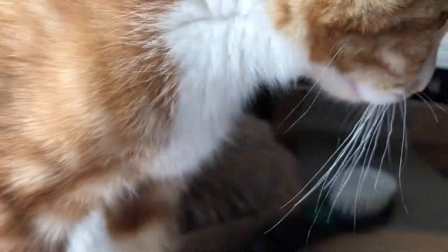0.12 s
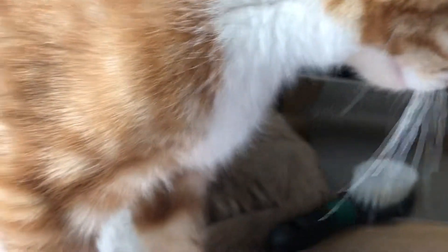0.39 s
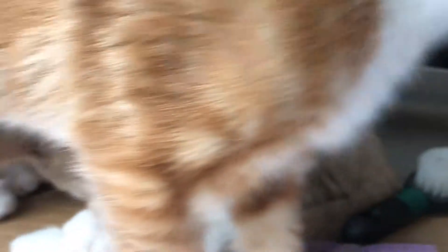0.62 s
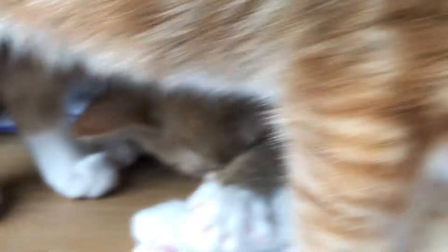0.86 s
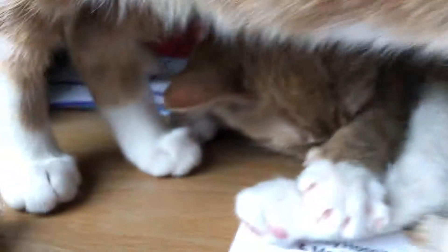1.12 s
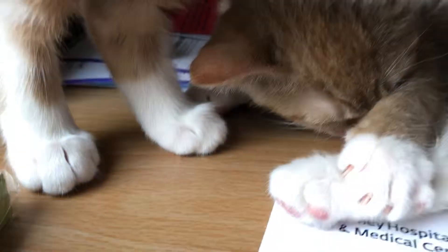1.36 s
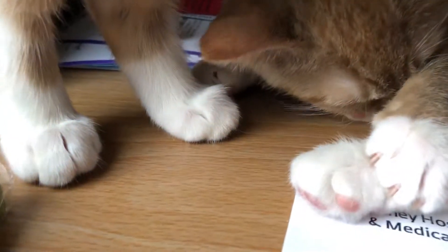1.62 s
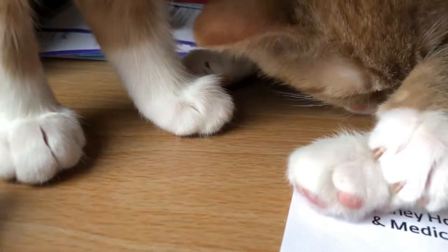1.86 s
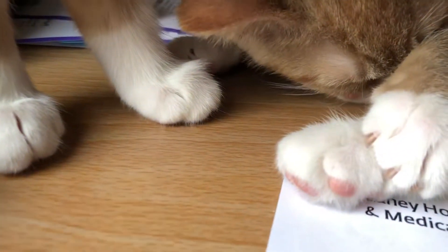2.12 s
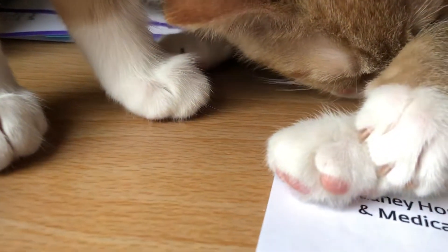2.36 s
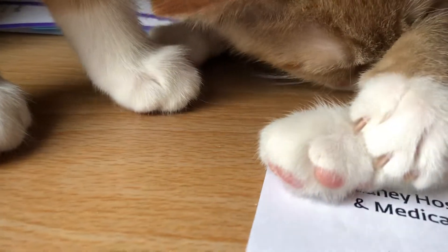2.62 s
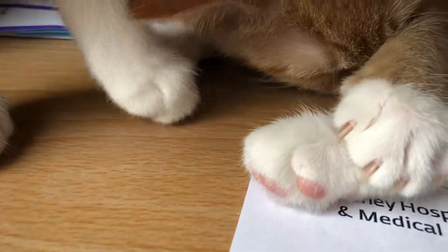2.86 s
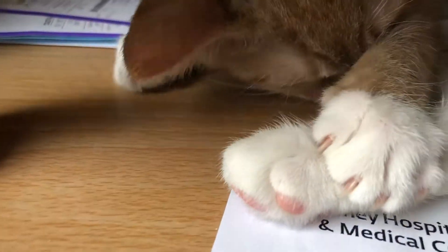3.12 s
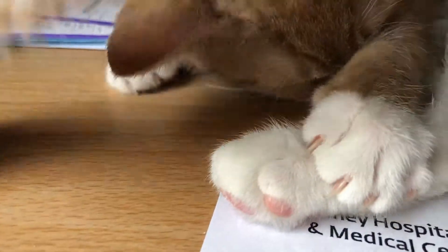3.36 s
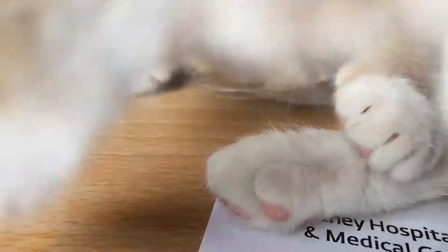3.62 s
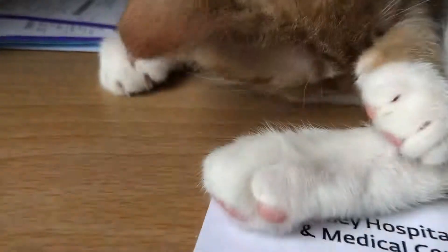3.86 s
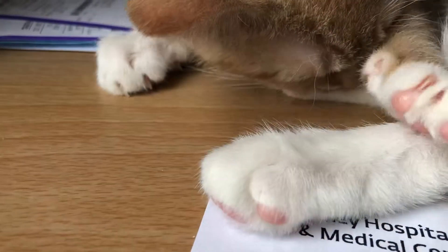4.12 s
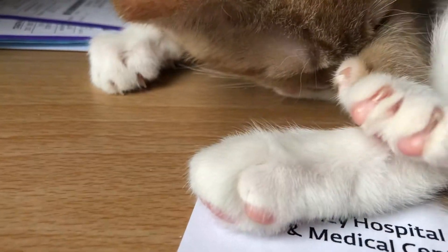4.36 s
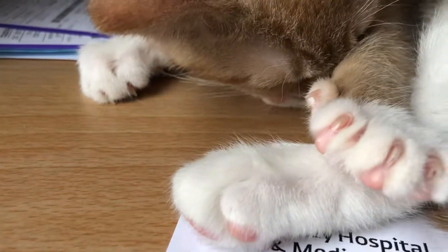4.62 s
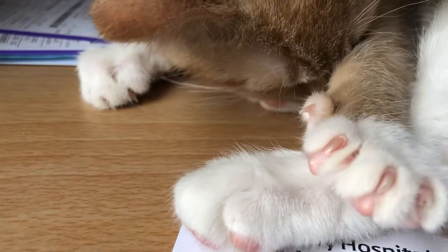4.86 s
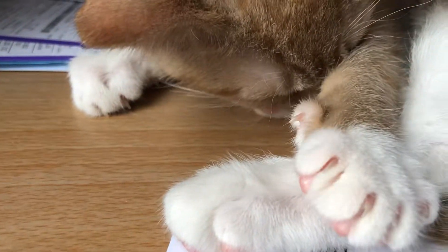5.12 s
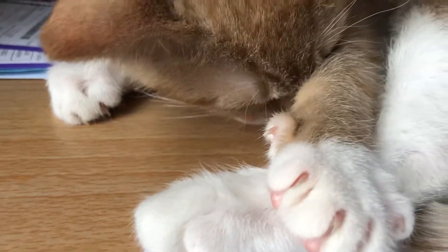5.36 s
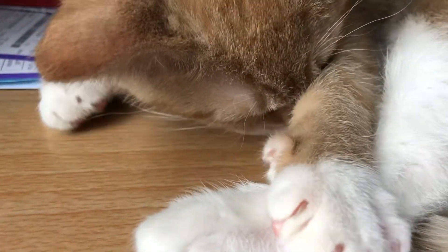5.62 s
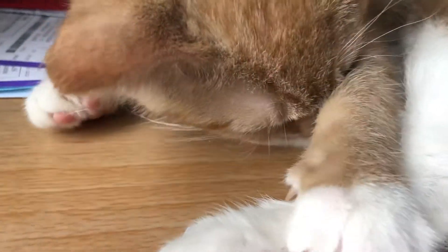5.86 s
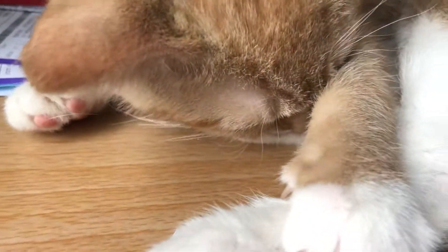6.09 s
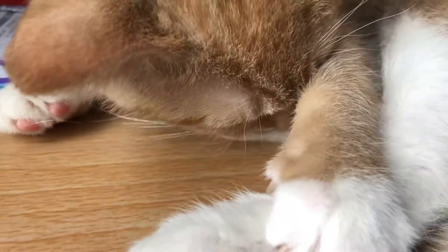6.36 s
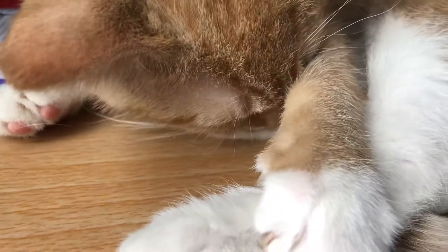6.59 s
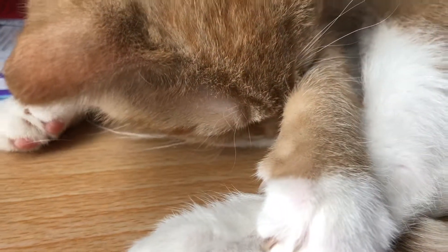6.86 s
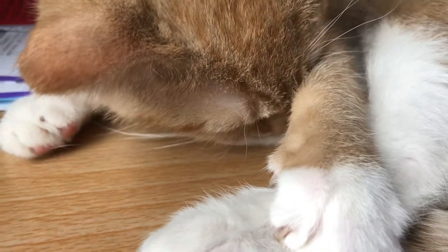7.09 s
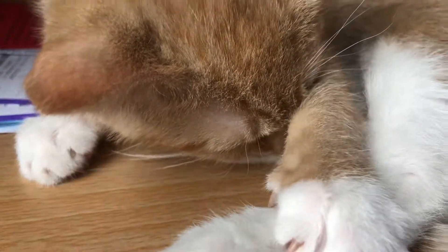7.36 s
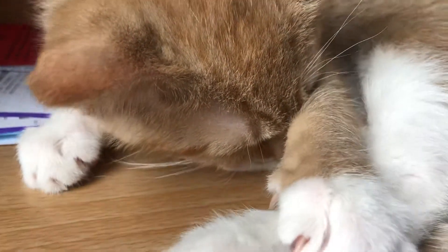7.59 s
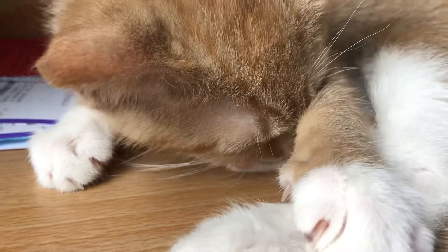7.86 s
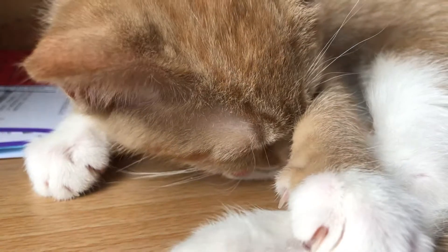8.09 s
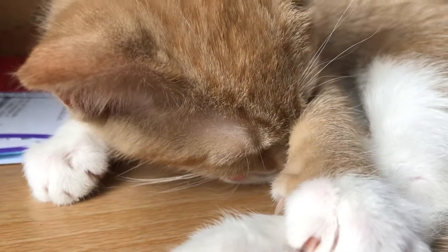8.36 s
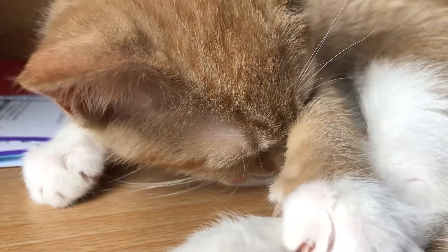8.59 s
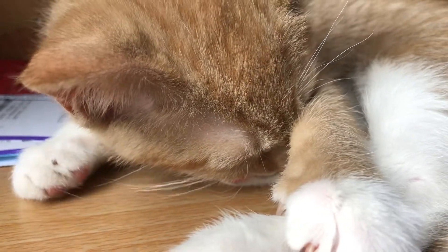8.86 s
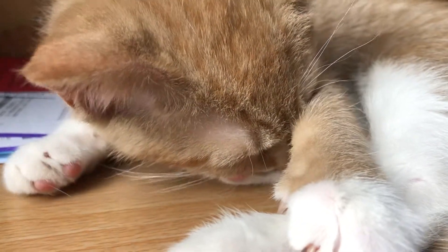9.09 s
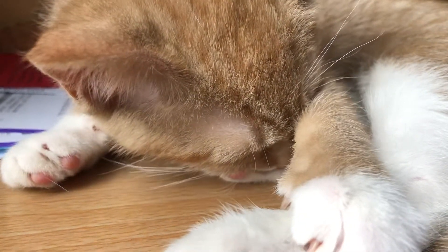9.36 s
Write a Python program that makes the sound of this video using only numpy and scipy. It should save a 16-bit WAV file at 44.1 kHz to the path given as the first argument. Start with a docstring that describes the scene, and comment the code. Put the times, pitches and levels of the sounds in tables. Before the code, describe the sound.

Close, throaty kitten purring swells and dips with each breath while its mouth ticks, smacks and squeaks wetly in a quiet room.

```python
"""Kitten purring as it suckles

Close at the microphone in a quiet room, a kitten purrs: two larynx pulses a cycle, some 27 cycles a second,
each filtered by throat resonances. Its mouth gives wet hisses, smacks, clicks and thin squeaks, made from
grains, ringing bubbles and gliding tones. A second cat purrs briefly at the start in single pulses. A paw
thumps once; coloured noise makes the fan and room; narrow low tones ring under them all."""
import sys
import numpy as np
from scipy import signal
from scipy.fft import rfft, irfft, next_fast_len
from scipy.io import wavfile
from scipy.ndimage import uniform_filter1d

SR = 44100
rng = np.random.default_rng(int(sys.argv[2]) if len(sys.argv) > 2 else 0)


def store_pcm(level_fs):
    """Save levels as 16-bit WAV."""
    pcm = np.round(np.clip(level_fs, -1, 1) * 32767).astype(np.int16)
    wavfile.write(sys.argv[1], SR, np.atleast_2d(pcm).T)


def attenuation_scalar(level_db):
    """Turn a level in dB into a linear amplitude multiplier (20 dB per decade)."""
    decades = np.asarray(level_db, float) / 20
    return 10 ** decades


N = 417627


def rms_one(x):
    """Scale to unit rms."""
    return x / np.sqrt(np.mean(x ** 2) + 1e-20)


def resonate(x, hz, width_hz):
    """Two-pole resonance with gain 1 on top."""
    r = np.exp(-np.pi * width_hz / SR)
    poles = [1, -2 * r * np.cos(2 * np.pi * hz / SR), r * r]
    return signal.lfilter([(1 - r * r) / 2, 0, (r * r - 1) / 2], poles, x)


def band(x, low, high):
    """Butterworth band-pass."""
    return signal.sosfilt(signal.butter(2, [low, high], "band", fs=SR, output="sos"), x)


def impulses(s, sizes):
    """One single-sample click per time."""
    at = np.round(np.asarray(s) * SR).astype(int)
    inside = (at >= 0) & (at < N)
    return np.bincount(at[inside], np.asarray(sizes)[inside], N) + 1e-18


# room and fan noise before overall scaling: pitch_hz, level_db (per Hz)
HUM = [(20, -85), (40, -10), (80, -7), (160, -2.5), (350, -8.5), (420, -16.5), (670, -14.5), (1160, -24.5),
       (1500, -28), (1800, -30.5), (2700, -35.5), (4100, -37.5), (5500, -33), (7200, -37), (9500, -32),
       (10300, -39.5), (13000, -43), (16000, -49.5)]
# edges between the treble bands that flicker apart: pitch_hz
HUM_FLICKER_HZ = [2500, 4200, 5600, 7200, 8800, 10400, 12200, 14000, 16000]


def hum():
    """Noise coloured by the room spectrum; its treble bands rise and sink on their own."""
    hum_db, flicker_db, step = -55, 1.6, 4096   # step: samples between flicker points
    hz, db = np.transpose(HUM)
    grid = np.linspace(1, SR / 2, N // 2 + 1)
    coloured = rfft(rng.standard_normal(N)) * attenuation_scalar(np.interp(np.log(grid), np.log(hz), db))
    part = np.searchsorted(HUM_FLICKER_HZ, grid)
    sway_db = rng.standard_normal((len(HUM_FLICKER_HZ) + 1, N // step + 2)) * flicker_db
    sway_db[0] = 0   # below the lowest edge it holds steady
    total = 0
    for k, row in enumerate(sway_db):
        noise = irfft(coloured * (part == k), next_fast_len(N))[:N]
        total = total + noise * attenuation_scalar(np.interp(np.arange(N) / step, np.arange(len(row)), row))
    return attenuation_scalar(hum_db) * rms_one(total)


# the kitten's breaths: start_s, purr_cycles, mid_breath_lateness_ms, late_then_early_sway_ms,
# first_pulse_lead_ms, airflow (1 out, -1 in, 0 held)
BREATHS = [(-0.0514, 9, 3.2, 0.7, 13.7, 1), (0.2851, 24, -4.2, 1.9, 13.5, -1),
           (1.1317, 24, 11.6, -0.7, 13.3, 1), (2.0305, 21, -1.5, -1.1, 11.8, -1),
           (2.7743, 15, 0.1, -1.5, 13.2, 1), (3.3341, 9, 2.5, -1.3, 13.8, 0),
           (3.6417, 18, -4.3, 1.5, 11.2, -1), (4.2568, 21, 5.8, -0.9, 13.6, 1),
           (5.0348, 15, -6.7, -0.4, 11.6, -1), (5.5625, 18, 1.0, -1.6, 12.8, 1),
           (6.2409, 18, -2.8, 0.7, 11.3, -1), (6.8789, 12, -0.3, -0.0, 12.8, 0),
           (7.3134, 27, 2.1, -1.2, 12.8, 1), (8.3431, 15, 0.4, -1.4, 12.0, -1),
           (8.8913, 6, 1.4, 0.3, 12.5, 0), (9.1011, 12, -4.4, 0.1, 12.5, 1)]
# purr strength of each breath: level_db
BREATH_DB = [-48, -45.5, -37, -36.5, -36.5, -36.5, -38, -37.5, -38.5, -35.5, -36.5, -40.5, -37, -38, -41.5,
             -37]
# the purr falters: centre_s, change_db, half_length_s
FALTERS = [(1.48, -3.5, 0.1), (1.797, -3.5, 0.074), (5, -5, 0.054), (5.666, -6.5, 0.1), (5.96, -3.5, 0.075),
           (6.253, -4.5, 0.12), (7.21, -4.5, 0.094), (7.794, -7.5, 0.05), (8.075, -8.5, 0.063),
           (8.305, -3.5, 0.059), (9.12, -8, 0.034)]


def breathing():
    """Per purr cycle: time, lead of the first pulse, strength and whether air flows out."""
    last_breath_end_s, turn_db = 9.5524, -41   # the purr sinks at least to turn_db where the airflow turns
    swell_s, fade_s = {1: 0.093, -1: 0.3, 0: 0.085}, {1: 0.093, -1: 0.51, 0: 0.11}   # by airflow
    start, cycles, late_ms, sway_ms, lead_ms, flow = np.transpose(BREATHS)
    end = np.append(start[1:], last_breath_end_s)
    k = np.repeat(np.arange(len(start)), cycles.astype(int))   # breath that each cycle belongs to
    part = (np.arange(len(k)) - (np.cumsum(cycles) - cycles)[k]) / cycles[k]
    when = start[k] + part * (end - start)[k]
    when += late_ms[k] / 1000 * 4 * part * (1 - part)
    when += sway_ms[k] / 1000 * np.sin(2 * np.pi * part)
    corners = []
    for s, e, f, db, before_db in zip(start, end, flow, BREATH_DB, [BREATH_DB[0]] + BREATH_DB):
        if f != 0:
            corners.append((s, min(turn_db, db, before_db)))
        corners += [(s + swell_s[f], db), (e - fade_s[f], db)]
    db = np.interp(when, *np.transpose(sorted(corners)))
    db += sum(change_db * np.exp(-((when - s) / half_s) ** 2) for s, change_db, half_s in FALTERS)
    return when, uniform_filter1d(lead_ms[k], size=3), db, flow[k] > 0


# throat and chest resonances, levels relative: pitch_hz, width_hz, first_pulse_db,
# second_pulse_breathing_in_db, second_cat_db, second_pulse_breathing_out_db
THROAT = [(110.5, 124, 8, 0, -7, -0.5), (290, 412, 7, 3.5, -6.5, 3.5), (652, 160, 3, -3, -10, 6.5),
          (918, 480, -14, -7, -12.5, -4), (1448, 152, -13.5, 9.5, -15, 0), (2150, 480, -33, -0.5, -19.5, 0),
          (3300, 210, -46, -57, -23, 0), (6100, 500, -60, -60, -22, 0)]


def through_throat(clicks, rows, column, lag_hz, top_hz, count, chest_ms=0):
    """Resonances in parallel; soft tissue delays the lows, so each pulse sweeps downward. A unit click peaks at 1."""
    signs = (-1, 1, 1, -1, 1, -1, 1, -1)
    out = 0
    for k in rows:
        delay = round(chest_ms * SR / 1000) if k < 2 else 0   # the two chest resonances may answer late
        out = out + signs[k] * attenuation_scalar(THROAT[k][column]) * resonate(np.arange(4096) == delay, *THROAT[k][:2])
    a = (1 - np.tan(np.pi * lag_hz / SR)) / (1 + np.tan(np.pi * lag_hz / SR))
    for _ in range(count):
        out = signal.lfilter([-a, 1], [1, -a], out)   # all-pass
    out = signal.sosfilt(signal.butter(4, top_hz, fs=SR, output="sos"), out)
    return signal.oaconvolve(clicks, out / np.abs(out).max())[:N]


# the larynx through the purr: time_s, first_over_second_pulse_db, rasp_level_db
LARYNX = [(0.05, -11, -62), (0.25, -6, -61), (0.45, -12.5, -52.5), (0.65, 4, -60), (0.85, 4, -56),
          (1.05, 2, -56), (1.25, 2, -50.5), (1.45, 9, -55), (1.65, 3.5, -52.5), (1.85, 4, -53.5),
          (2.05, -9, -49.5), (2.25, -8, -48), (2.45, -6.5, -49.5), (2.65, -2, -56), (2.85, 4.5, -55),
          (3.05, 4.5, -51), (3.25, 0, -45), (3.45, 7, -51.5), (3.65, -9, -47), (3.85, -3, -48.5),
          (4.05, -5, -50), (4.25, 0, -58), (4.45, 5.5, -48), (4.65, -1.5, -47), (4.85, 11.5, -54.5),
          (5.05, -3, -49.5), (5.25, -5, -46), (5.45, -1, -57), (5.65, 5, -49.5), (5.85, 3, -50.5),
          (6.05, 2.5, -48), (6.25, 9.5, -54.3), (6.45, -7.2, -48), (6.65, 3, -48.5), (6.85, -3, -48.5),
          (7.05, 5, -59), (7.25, 5, -64), (7.45, 4.5, -52), (7.65, 0.5, -51), (7.85, 11, -50.0),
          (8.05, 1.2, -51), (8.25, 4.5, -55), (8.45, -6.5, -49.6), (8.65, -8, -47), (8.85, 4.5, -55),
          (9.05, 2, -57.5), (9.25, 8.5, -50), (9.45, -3, -59)]


def purr():
    """The larynx gives a dull pulse, then a raspy one that turns over with the airflow; faint flutters between."""
    blown_chest_ms = 1.2   # breathing out, the chest answers the second pulse late
    breathy_db, breathy_s = -28.5, 0.0031   # air hissing past the folds after each raspy pulse
    knock_db, knock_spread_db = -15.5, 2
    when, lead_ms, db, outward = breathing()
    chance = rng.standard_normal((len(when), 11))
    s, balance_db, rasp_db = np.transpose(LARYNX)
    balance_db, rasp_db = np.interp(when, s, balance_db), np.interp(when, s, rasp_db)
    second = when - .0025 + 0.00042 * chance[:, 0]
    first = second - lead_ms / 1000 + 0.00048 * chance[:, 1]
    first_size, second_size, rasp_size = attenuation_scalar(db + balance_db / 2), attenuation_scalar(db - balance_db / 2), attenuation_scalar(rasp_db)

    dull = impulses(first, first_size * attenuation_scalar(1.1 * chance[:, 2]))
    dull += impulses(second + .011 + 0.00187 * chance[:, 4], second_size * attenuation_scalar(-16.5 + 3.4 * chance[:, 5]))
    second_size = second_size * attenuation_scalar(1.1 * chance[:, 3])
    drawn = impulses(second, second_size * ~outward)
    drawn += impulses(first + 0.00604 + 0.00197 * chance[:, 6], first_size * attenuation_scalar(-12.5 + 5.9 * chance[:, 7]))
    blown = impulses(second + 0.0004, -second_size * outward)

    rasp_size = rasp_size * attenuation_scalar(1.5 * chance[:, 8] + .8 * chance[:, 3])
    rasp = impulses(second - .0003, rasp_size * np.where(outward, -1, 1))
    puff = signal.lfilter([1], [1, -np.exp(-1 / (breathy_s * SR))], np.abs(rasp))
    rasp += attenuation_scalar(breathy_db) * puff * rng.standard_normal(N)
    rasp += impulses(first, first_size * attenuation_scalar(-27.5 + 6.2 * chance[:, 9]))
    rattle = (rng.random(N) < 150.0 / SR) * attenuation_scalar(-18 + 3.5 * rng.standard_normal(N)) * rng.choice([-1, 1], N)
    rasp += rattle * attenuation_scalar(np.interp(np.arange(N) / SR, when, rasp_db))

    # no two closures ring the upper throat alike
    knock = impulses(first, first_size * attenuation_scalar(knock_db) * chance[:, 10])
    knock_size = second_size * attenuation_scalar(knock_db + knock_spread_db * chance[:, 9])
    knock += impulses(second, knock_size * np.sign(chance[:, 7]))
    return (through_throat(knock, range(2, 4), column=3, lag_hz=704, top_hz=954, count=4)
            + through_throat(dull, range(4), column=2, lag_hz=590, top_hz=805, count=6)
            + through_throat(drawn, range(4), column=3, lag_hz=636, top_hz=830, count=6)
            + through_throat(blown, range(4), column=5, lag_hz=618, top_hz=806, count=6, chest_ms=blown_chest_ms)
            + through_throat(rasp, range(4, 6), column=3, lag_hz=880, top_hz=2580, count=1))


# breaths of the second cat: start_s, pulses, period_ms, level_db
OTHER_CAT = [(0.018, 9, 39.9, -36), (0.407, 9, 34.9, -44), (0.729, 5, 41.3, -35)]
# its pulses that nearly fail or stand out: time_s, change_db
OTHER_UNEVEN = [(0.018, -5), (0.058, -5.5), (0.098, -23), (0.297, -11), (0.407, -18), (0.547, -1),
                (0.582, 1), (0.652, -6), (0.770, 2.5), (0.812, -21), (0.853, -2), (0.894, -5)]


def other_cat():
    """Single brighter pulses through the same resonances, weaker in the lows, with a nasal ring; some nearly fail."""
    swell_db, swell_s, buzz_db = -5.5, 0.1, -14.5   # buzz: the two top resonances under the pulse
    nasal_hz, nasal_width_hz, nasal_db = 1650, 530, -7   # this cat's own ring
    rows = []
    for start, count, period_ms, level_db in OTHER_CAT:
        for t in np.arange(count) * period_ms / 1000:   # each breath swells in
            rows.append((start + t, level_db + swell_db * np.exp(-t / swell_s)))
    s, db = np.transpose(rows)
    at, change_db = np.transpose(OTHER_UNEVEN)
    db += (np.abs(s[:, None] - at) < .01) @ change_db
    pulses = impulses(s, attenuation_scalar(db + 0.92 * rng.standard_normal(len(s))))
    buzz = through_throat(pulses, range(6, 8), column=4, lag_hz=920, top_hz=6900, count=4)
    buzz = sum(resonate(buzz, hz, 3.3 * width_hz) for hz, width_hz, *_ in THROAT[6:])
    nasal = resonate(band(pulses, 1240, 2070), nasal_hz, nasal_width_hz)
    nasal = resonate(nasal, nasal_hz, 2 * nasal_width_hz) * attenuation_scalar(nasal_db) * SR / (2 * nasal_width_hz)
    voice = through_throat(pulses, range(4), column=4, lag_hz=905, top_hz=1290, count=4)
    return voice + nasal + attenuation_scalar(buzz_db) * buzz


# mouth cavity resonances, levels relative: pitch_hz, width_hz, level_db
MOUTH = [(600, 200, -2.5), (960, 325, 0), (1555, 180, 1.5), (2230, 460, -4.5)]


def mouth(x):
    """The small cavity between tongue and palate rings; wet walls dull its top."""
    rings = sum((-1) ** k * attenuation_scalar(db) * resonate(x, hz, width_hz) for k, (hz, width_hz, db) in enumerate(MOUTH))
    return band(rings, 380, 3400)


# tongue and lip clicks: time_s, level_db (spit and bubble), bubble_pitch_hz, cavity_peak_db
CLICKS = [(0.494, -48, 5930, -49), (0.634, -46, 7500, -64), (0.737, -65, 2600, -55),
          (1.1925, -57, 2600, -52), (1.203, -50, 4170, -56), (1.2055, -47, 8700, -68),
          (1.216, -40, 3380, -52), (1.2235, -58, 2700, -54), (1.238, -45, 12800, -46),
          (1.4355, -36, 8400, -44), (1.493, -39, 8460, -50), (1.7076, -42, 4230, -60),
          (1.7503, -50, 4000, -61), (1.757, -47, 4450, -48), (1.761, -63, 2600, -46),
          (2.167, -45, 6100, -63), (2.2524, -62, 2870, -42), (2.4697, -56, 4500, -51),
          (2.638, -52, 4900, -68), (2.698, -43, 9000, -53), (2.701, -47, 9100, -55),
          (2.731, -40.5, 2800, -42), (2.798, -69, 2700, -40), (2.804, -55, 2800, -48),
          (2.839, -53, 4000, -48), (3.2062, -39, 3420, -58), (3.212, -40, 3440, -36.5),
          (3.2198, -38, 3600, -39), (3.2423, -27.5, 3620, -33.5), (3.28, -38, 5760, -57),
          (3.4534, -41.5, 3500, -43), (3.640, -60, 2600, -59), (3.642, -46, 9000, -54),
          (3.6445, -37, 4940, -54), (3.667, -44, 3190, -47), (3.7965, -47, 3260, -43),
          (3.919, -39, 3760, -43), (4.0904, -42, 3460, -49), (4.1408, -59, 2600, -39.5),
          (4.2183, -60, 3330, -43), (4.261, -33, 9540, -59), (4.448, -41.5, 3480, -41),
          (4.478, -46, 7790, -53), (4.52, -40.5, 3160, -51), (4.663, -45, 8340, -53),
          (4.839, -52, 6040, -48), (4.874, -52, 4300, -39.5), (4.878, -46, 3300, -41),
          (4.997, -43, 2650, -44), (5.2237, -49, 5300, -45), (5.229, -49, 5300, -35),
          (5.229, -46, 3200, -44), (5.267, -45, 8600, -58), (5.292, -38, 6100, -48),
          (5.3198, -45, 2600, -31.5), (5.353, -35.5, 5700, -57), (5.4173, -32, 3240, -31),
          (5.405, -62, 2600, -42), (5.6454, -45, 2800, -64), (5.692, -51, 5600, -66),
          (5.7255, -46.5, 5340, -62), (5.870, -53, 4600, -66), (5.882, -49, 3100, -64),
          (5.928, -46, 4850, -58), (6.5954, -53, 5100, -66), (6.854, -45, 4500, -53),
          (7.0429, -54, 6800, -41), (7.3013, -51, 2640, -43), (7.312, -62, 2600, -48),
          (7.567, -65, 2580, -37.5), (7.837, -64, 2700, -33), (7.977, -39, 8050, -52),
          (8.016, -36.5, 3520, -47), (8.1258, -36.5, 6500, -49), (8.255, -36, 7980, -62),
          (8.2866, -29, 7400, -63), (8.4443, -45.5, 3820, -63), (8.5784, -44, 9750, -57),
          (8.5884, -35, 9140, -44), (8.8135, -33, 4020, -60), (8.862, -31, 5470, -59),
          (8.8676, -50, 3000, -53), (8.873, -54, 2700, -46), (8.9472, -36, 3700, -41.5),
          (9.0005, -44, 3700, -46), (9.0084, -38.5, 3680, -37), (9.273, -43, 2610, -36),
          (9.2755, -31, 2520, -18.5), (9.2886, -34, 2600, -37), (9.3576, -41, 2600, -37.5),
          (9.4273, -61, 2600, -31.5), (9.437, -62, 2730, -42)]


def clicks():
    """Each click: a spit of noise, a bubble ringing a few cycles, a knock into the mouth; tiny ones come at random."""
    s, db, hz, cavity_db = np.transpose(CLICKS)
    knock = mouth(np.arange(400) == 0)
    out = mouth(impulses(s, attenuation_scalar(cavity_db))) / np.abs(knock).max()
    t = np.arange(200) / SR
    spits = rng.standard_normal((len(s), len(t))) * np.exp(-t / 0.0011) * np.minimum(t / 0.00032, 1)
    for i, size, f, spit in zip(np.round(s * SR).astype(int), attenuation_scalar(db), hz, spits):
        noise = .75 * band(spit, 3000, 8000) + .35 * band(spit, .75 * f, 1.3 * f)
        bubble = np.sin(2 * np.pi * f * t) * np.exp(-t * f / 2.2)
        out[i:i + len(t)] += size * (noise + .6 * bubble)
    tiny = (rng.random(N) < 45.0 / SR) * attenuation_scalar(-53 + 4.0 * rng.standard_normal(N))   # 45 a second
    return out + band(tiny, 2500, 6000)


# air whistling through a wet slit: start_s, length_ms, start_pitch_hz, end_pitch_hz, level_db
SQUEAKS = [(0.163, 2.3, 3220, 3020, -47.5), (1.237, 5, 8460, 8900, -54), (1.241, 9, 9800, 14000, -55),
           (1.249, 5.4, 13500, 11800, -43), (1.254, 6, 13800, 14600, -49), (1.259, 10, 13800, 11000, -57),
           (1.478, 10, 11300, 14000, -41), (1.709, 5.5, 5200, 4620, -56), (2.400, 11, 4680, 4840, -64),
           (2.401, 4, 7300, 9200, -57), (2.404, 4, 9000, 6800, -62), (2.407, 4, 7700, 7500, -60),
           (3.581, 5.7, 3450, 3570, -60), (3.588, 19, 3900, 3300, -63), (3.604, 5, 4280, 4900, -59),
           (3.396, 12, 4430, 3200, -61), (3.6035, 4.6, 7500, 9200, -54), (3.6248, 3.8, 6040, 3450, -47.5),
           (3.6306, 5.8, 3800, 3040, -46), (4.853, 3.9, 3300, 4200, -44.5), (4.852, 2.2, 6100, 5800, -44),
           (4.8575, 3.9, 4600, 6740, -35), (4.8598, 3.4, 6830, 6250, -35.5), (4.862, 2.1, 7800, 6560, -41),
           (4.855, 7, 9800, 9700, -52), (5.03, 14, 2260, 2140, -51.5), (5.031, 8.3, 4570, 4250, -59),
           (5.964, 10, 10700, 6100, -62), (7.0422, 3.5, 2750, 2330, -46.5), (7.110, 2.7, 3600, 2500, -59),
           (8.290, 17, 6930, 8640, -42.5), (8.305, 6.3, 10100, 12600, -53), (8.318, 5.8, 8400, 10900, -52),
           (8.561, 3, 6930, 10000, -35.5), (8.564, 7.9, 9900, 9550, -44), (8.584, 17.5, 9000, 9700, -46.5),
           (8.8081, 6, 5300, 3950, -36.5), (8.818, 3, 5700, 4900, -40), (8.8205, 8.5, 4850, 4300, -37),
           (8.8286, 2.5, 5000, 5100, -41), (8.8312, 4.6, 4700, 3900, -39), (8.8348, 26, 5350, 4050, -45),
           (8.8621, 5, 5600, 3000, -53), (8.8505, 3, 6850, 6800, -51), (9.086, 9.5, 4030, 3300, -53.5),
           (9.094, 6.3, 6030, 9000, -55.5), (9.253, 18, 7200, 9140, -66)]
# the mouth cavity rings and glides as a smack opens it: same columns as the squeaks
SMACKS = [(5.2072, 5.1, 1110, 1360, -32.5), (5.2123, 10, 1235, 1480, -33), (5.4169, 4.7, 1700, 1270, -25),
          (5.421, 4.7, 1470, 1310, -32), (9.2962, 5.9, 750, 1500, -47)]


def squeaks():
    """Gliding whistles and cavity rings with an overtone, wavering a little in pitch and level."""
    reedy_hz, reedy_db, thin_db = (3800, 5000), -6, -21.5   # overtone inside and outside the reedy range
    smack_top_hz, smack_ratio, smack_db = 2000, 1.65, -7   # lower starts are smacks, with a second cavity ring
    fall_bend = 1.45   # falling squeaks drop fast, then level off
    out = np.zeros(N)
    waver = rms_one(band(rng.standard_normal(N), 76, 840))
    for s, ms, start_hz, end_hz, db in SQUEAKS + SMACKS:
        reedy = reedy_hz[0] < (start_hz + end_hz) / 2 < reedy_hz[1]
        ratio, overtone_db = 2, reedy_db if reedy else thin_db
        if start_hz < smack_top_hz:
            ratio, overtone_db = smack_ratio, smack_db
        i, n = round(s * SR), round(ms * SR / 1000)
        gone = 1 - np.linspace(1, 0, n) ** (fall_bend if end_hz < start_hz else 1)
        pitch = start_hz * (end_hz / start_hz) ** gone * (1 + .012 * waver[i:i + n])
        phase = 2 * np.pi * np.cumsum(pitch) / SR
        shape = np.sin(np.linspace(0, np.pi, n)) ** 0.4 * attenuation_scalar(db + 1.5 * waver[i + n:i + 2 * n])
        overtone = attenuation_scalar(overtone_db) * np.sin(ratio * phase) * (pitch < SR / 5)
        out[i:i + n] += shape * (np.sin(phase) + overtone)
    return out


# wet suction strokes: start_s, length_ms, mouth_cavity_db, low_fizz_db, high_fizz_db
SUCKS = [(1.192, 20, -65, -63.5, -62), (1.225, 35, -75, -62.5, -61), (1.437, 27.5, -87, -53.5, -53.5),
         (1.468, 30, -56, -54.5, -53.5), (2.47, 66, -75, -70, -70), (2.718, 14, -63, -60.5, -58.5),
         (2.95, 19, -80, -66, -59), (2.975, 22, -67, -57, -56), (3.236, 36, -69, -63, -63),
         (3.269, 39, -75, -62, -59.5), (3.33, 49, -61, -66.5, -76), (3.57, 30, -62, -70, -80),
         (3.643, 13, -54.5, -63, -71), (3.793, 49, -61, -62.5, -70), (4.02, 48, -67, -65, -66),
         (4.191, 23, -72, -64, -75), (4.213, 17.6, -44, -53, -84), (4.259, 36, -67, -56, -49),
         (4.298, 20, -64, -57, -64), (4.475, 11, -69, -57, -54.5), (4.487, 73, -76, -66, -65),
         (4.852, 8.1, -57, -49, -46), (4.861, 14, -55, -73, -74), (5.027, 25, -67, -59.5, -89),
         (5.05, 22, -70, -66, -68), (5.207, 17.8, -37, -58, -70), (5.223, 16, -61, -64, -78),
         (5.291, 9, -62, -58, -78), (5.398, 11, -72, -61, -69), (5.415, 10.6, -36, -46, -72),
         (5.43, 39, -78, -66, -84), (5.911, 26, -78, -70, -65), (7.978, 15, -57, -53.5, -84),
         (7.995, 65, -75, -59.5, -68), (8.255, 4, -54.5, -51, -64), (8.273, 12, -74, -57.5, -56),
         (8.289, 6.9, -73, -77, -45), (8.298, 51, -80, -63, -63), (8.56, 3.2, -53, -54.5, -48),
         (8.565, 140, -69, -70, -77), (8.797, 18, -76, -58, -51.5), (8.86, 10, -61, -54, -60),
         (9.276, 2.8, -31.5, -63, -69), (9.28, 3, -42, -45, -68), (9.293, 10.5, -39.5, -53, -79),
         (9.305, 16, -51, -55.5, -82)]
# thin airy hisses, top fizz alone: start_s, length_ms, level_db
HISSES = [(1.2, 75, -65), (2.46, 84, -79), (4.851, 13, -57), (5.416, 10, -65), (8.817, 29, -64),
          (9.276, 9.5, -70)]
# low, high and top fizz bands: low_edge_hz, high_edge_hz
FIZZ_HZ = [(2600, 7300), (6700, 11400), (10600, 15500)]


def sucks():
    """Saliva films burst densely while the tongue pulls: uneven grains gated by each stroke."""
    top_fizz_db = -9.5   # under the high fizz
    faint_count, faint_span_s, faint_ms = 12, (.8, 6.0), 25   # faint strokes at random moments
    faint_db = (-76, -73, -80)   # cavity, low and high fizz
    strokes = []
    for a, b, c in rng.random((faint_count, 3)):
        levels = np.add(faint_db, 6.0 * (c - .5))
        strokes.append((np.interp(a, [0, 1], faint_span_s), faint_ms * (.5 + b), *levels))
    strokes = [(*row, row[-1] + top_fizz_db) for row in strokes + SUCKS]
    strokes += [(s, ms, -np.inf, -np.inf, -np.inf, db) for s, ms, db in HISSES]
    gates = np.zeros((4, N))
    for s, ms, *levels in strokes:
        i, n = round(s * SR), round(ms * SR / 1000)
        gates[:, i:i + n] += attenuation_scalar(np.array(levels))[:, None] * np.geomspace(1.3, .7, n)
    gates = uniform_filter1d(gates, size=60, axis=1)
    sizes = attenuation_scalar(0.6 * np.minimum(rng.exponential(1, (2, N)), 4)) * rng.choice([-1, 1], (2, N))
    pops, fizz = sizes * (rng.random((2, N)) < np.array([[1500], [3000]]) / SR)   # grains a second
    fizz = rms_one(fizz) + .5 * rng.standard_normal(N)
    # divide by the ungated spread so that the gates set the levels
    out = mouth(pops * gates[0]) / np.std(mouth(pops))
    for gate, edges in zip(gates[1:], FIZZ_HZ):
        out += band(fizz * gate, *edges) / np.std(band(fizz, *edges))
    return out


def paw():
    """A soft paw lands on the table: a low sine that dies away."""
    s, db, hz, decay_s = 3.8405, -36, 140, 0.012
    t = np.maximum(np.arange(N) / SR - s, 0)
    return attenuation_scalar(db) * np.sin(2 * np.pi * hz * t) * np.exp(-t / decay_s)


def room(x):
    """Ten feedback delays, duller on every round."""
    t60_s, wall_cut_hz = 0.12, 2800
    size = next_fast_len(N + SR)
    turn = np.exp(-2j * np.pi * np.arange(size // 2 + 1) / size)   # one sample of delay
    dull = np.exp(-2 * np.pi * wall_cut_hz / SR)
    echo = 0
    for k, lag in enumerate((rng.uniform(0.0073, 0.038, 10) * SR).astype(int)):
        loop = attenuation_scalar(-60 * lag / SR / t60_s) * (1 - dull) / (1 - dull * turn) * turn ** lag
        echo = echo + (-1) ** k * loop / (1 - loop)
    return irfft(rfft(x, size) * echo, size)[:N]


# narrow dips in the whole sound: pitch_hz, width_hz, depth (0 to 1)
NARROW_DIPS = [(399.3, 20, 0.83), (817, 33, 0.44)]
# narrow low resonances ring along: pitch_hz, width_hz, level_db (against the air)
LOW_RINGS = [(83.5, 5, -7), (164.5, 9, -6.5), (241, 18, -6.5), (118, 10, -11)]


def low_rings_and_dips(air):
    """Narrow dips hollow out the sound, and narrow low resonances ring along with the rest."""
    air = air - sum(depth * resonate(air, hz, width_hz) for hz, width_hz, depth in NARROW_DIPS)
    return air + sum(attenuation_scalar(db) * resonate(air, hz, width_hz) for hz, width_hz, db in LOW_RINGS)


def scene():
    """Cats, mouth, room and fan, with narrow low rings and dips over all."""
    room_db, lips_room_db = -25.5, -10   # the mouth faces the microphone and stirs the room less
    body = purr() + other_cat() + paw()
    lips = clicks() + squeaks() + sucks()
    echoes = attenuation_scalar(room_db) * room(body + attenuation_scalar(lips_room_db) * lips)
    return low_rings_and_dips(body + lips + echoes + hum())[None]


def band_limit(x):
    """A steep low-pass at the top of the band."""
    return signal.sosfilt(signal.butter(12, 16480, fs=SR, output="sos"), x)


def record(dry):
    """A small microphone that loses the deep bass, below 40 Hz."""
    mix = signal.sosfilt(signal.butter(2, 40, "high", fs=SR, output="sos"), dry)
    return band_limit(mix)


dry = scene()
out = record(dry)
store_pcm(out)
```